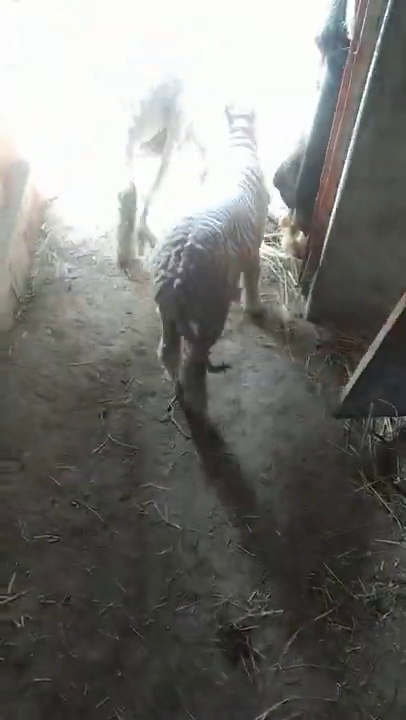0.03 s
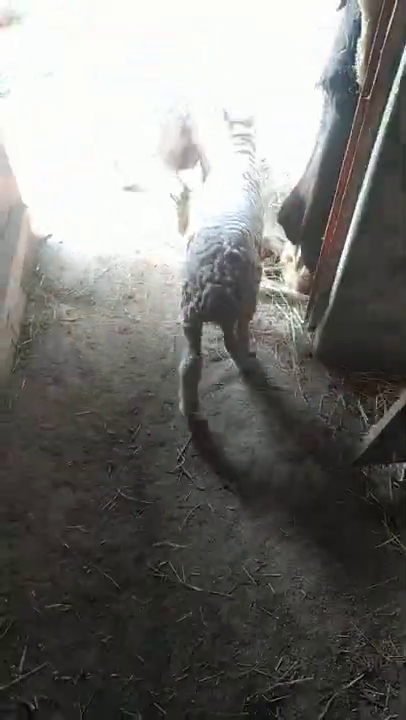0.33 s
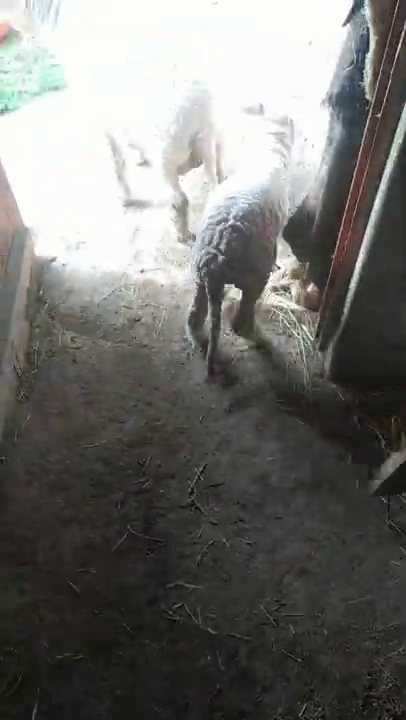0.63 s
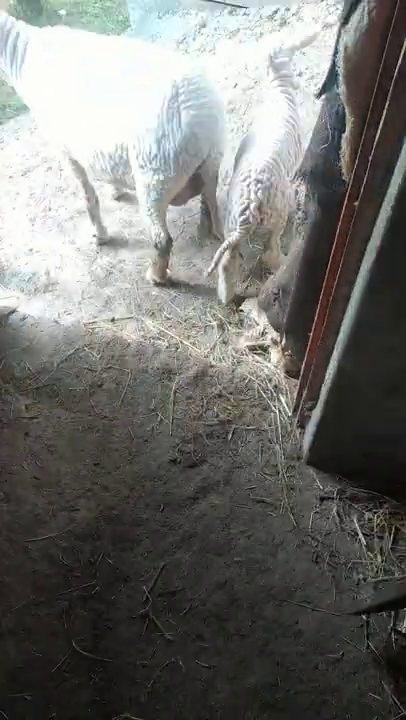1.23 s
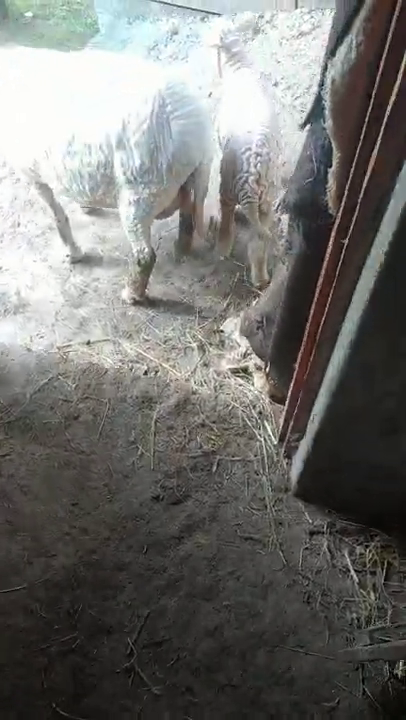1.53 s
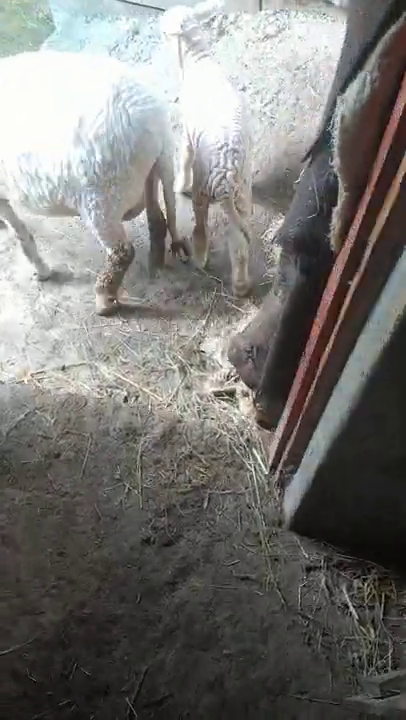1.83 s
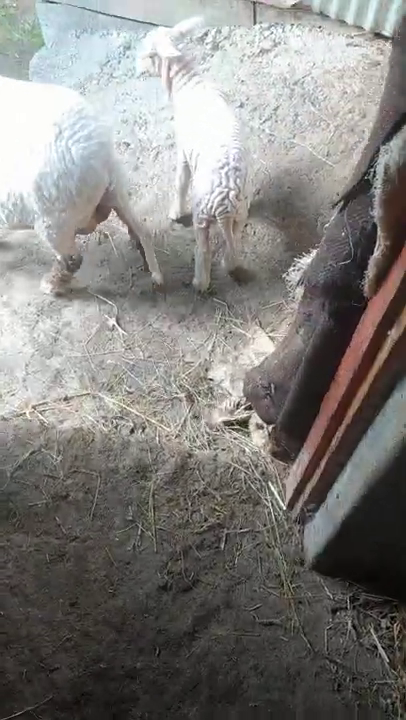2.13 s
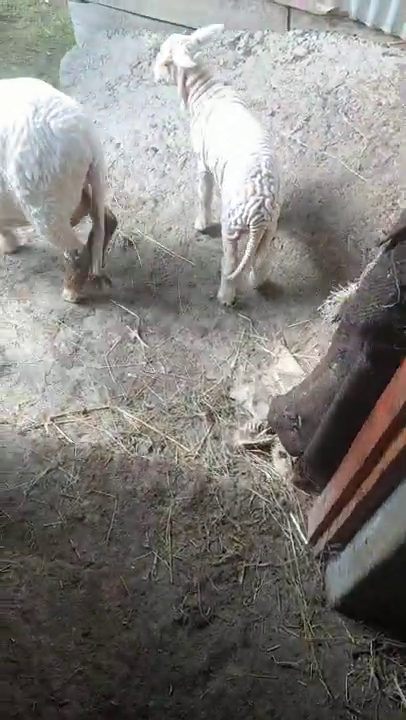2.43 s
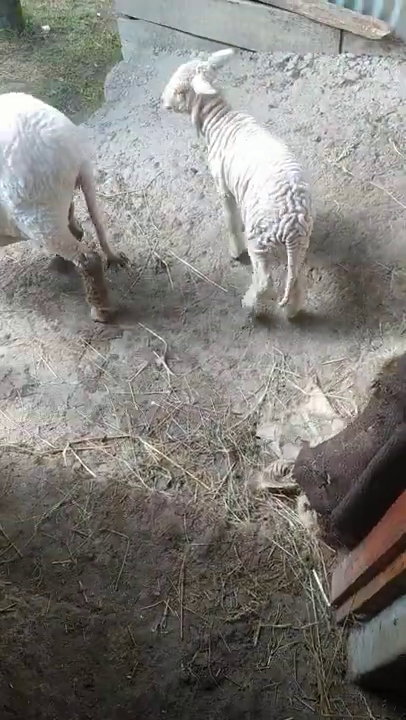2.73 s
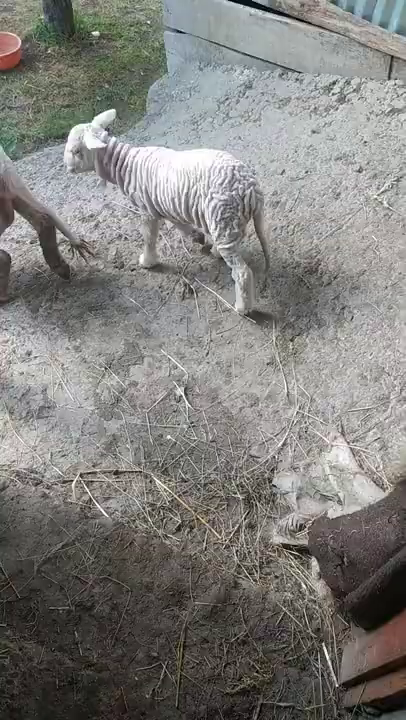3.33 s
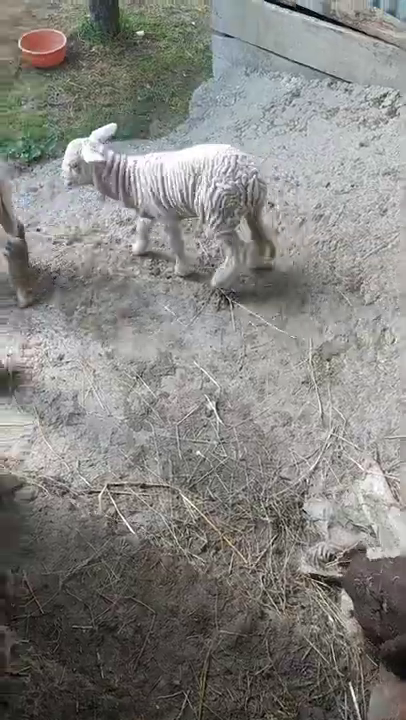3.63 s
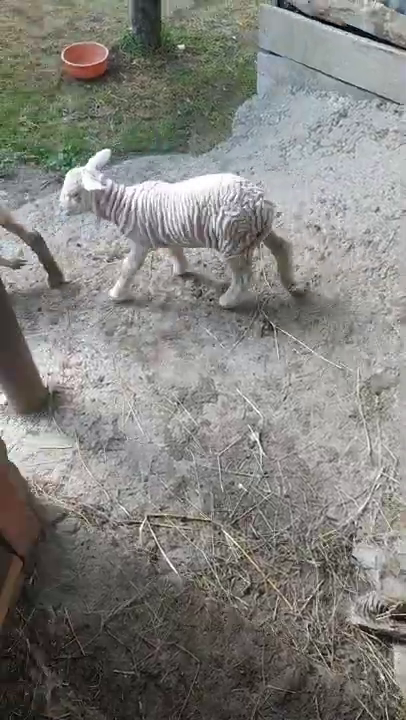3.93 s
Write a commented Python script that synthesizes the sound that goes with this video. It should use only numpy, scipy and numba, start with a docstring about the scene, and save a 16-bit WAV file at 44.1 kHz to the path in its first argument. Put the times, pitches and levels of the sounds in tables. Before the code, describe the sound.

A sheep gives one hoarse, quavering bleat from about 2.7 to 3.6 seconds, just after a soft closed-mouth murmur at 2.5. Before that, hooves tick, thud and scuff over straw and dry earth, busiest in the first 1.3 seconds. Faint gliding whistles pass between 2 and 2.8 seconds. Hooves knock at 2.2 and, more sharply, at 3.8. Shed walls add slight reflections over a quiet outdoor hiss.

```python
"""At a shed door, a ewe murmurs with her mouth shut, then gives one hoarse, quavering bleat:
uneven vocal pulses ring her throat and chop her breath into a rasp.
She and her lamb walk over straw and dry earth: hooves tick, knock, thud and scuff.
A few faint whistles glide by. The shed's walls scatter the sounds, over a quiet outdoor hiss."""
import sys
import numpy as np
from scipy import signal
from scipy.fft import rfft, irfft
from scipy.io import wavfile
from scipy.ndimage import uniform_filter1d
from numba import njit

SR = 44100
rng = np.random.default_rng(int(sys.argv[2]) if len(sys.argv) > 2 else 0)


def master_out(mix):
    """Clip the mix to full scale and print it as 16-bit PCM to the path in sys.argv[1]."""
    frames = np.transpose(np.atleast_2d(mix))
    ceiling = np.clip(frames, -1, 1)
    pcm = np.round(ceiling * 32767).astype(np.int16)
    wavfile.write(sys.argv[1], SR, pcm)


N = 176400

# spectrum of breaking straw: f/Hz, level/dB
STRAW_SPECTRUM = [(300, -9.5), (1500, -31.5), (3500, -10), (5500, -5), (7000, 0), (8300, 4.5), (9300, -2),
                  (10500, -11.5), (15500, -14.5)]
YARD_LAG_S, STRAW_LAG_S = 0.000411, 0.0001  # left channel's delay, by source position
HOOF_RISE_S = 0.004


def bleat():
    """Uneven vocal pulses ring the throat and gate a rasp; the mouth moves and the call quavers."""
    # t/s, pitch/Hz, voice/dB, rasp/dB, roughness/0-1
    call = [(2.677, 124.2, -45, -39, 0.82), (2.712, 128.2, -45.5, -47.5, 0.76),
            (2.759, 128.1, -37, -45, 0.8), (2.80, 135.1, -36.5, -39.5, 0.7),
            (2.9, 140.5, -35.5, -36.5, 0.71), (2.998, 141.6, -34.5, -35.5, 0.58),
            (3.142, 141.6, -33.5, -38, 0.48), (3.262, 139.1, -33, -37.5, 0.44),
            (3.371, 136.3, -37, -39, 0.3), (3.432, 131.5, -41.5, -44.5, 0.71),
            (3.49, 127.8, -43, -48.5, 0.6), (3.55, 126.7, -48.5, -55, 0.8), (3.655, 125.1, -58, -68, 0.91)]
    # throat resonances: f/Hz, nominal width/Hz, level/dB, share of mouth movement followed
    resonances = [(430, 54, -8.5, 0), (590, 78, 2, 0.84), (642.5, 60, 3.5, 0.97), (810, 81, -23, 0.93),
                  (1391, 108, -2, 0.5), (2082, 240, -13, 0.3)]
    # mouth opening: t/s, relative shift of the resonances
    mouth = [(2.68, -0.13), (2.76, -0.046), (2.82, 0.042), (2.90, -0.013), (3.15, 0.0064), (3.33, -0.061),
             (3.42, -0.082), (3.52, -0.096), (3.65, -.1)]
    # gliding top resonance: t/s, f/Hz, level/dB
    upper = [(2.68, 2130, -7), (2.85, 2260, -9.5), (3.05, 2340, -8.5), (3.298, 2514, -13),
             (3.421, 2670, -10.5), (3.549, 2760, -7.5), (3.65, 2890, -23)]
    # chest partials, fundamental first: level/dB
    partials = [-4, 0.5, -6, -11, 2.5, -5]
    # f/Hz, level/dB
    rasp_spectrum = [(150, -6), (400, -6), (620, 4), (800, -9), (1100, -9.5), (1400, 4.5), (1750, -11),
                     (2150, 2), (2500, -5.5), (2850, -18.5), (3200, -26), (3800, -15.5), (4700, -17),
                     (5500, -20.5), (7500, -11), (8800, -14.5), (10300, -33), (15000, -46)]
    quaver_hz, crest_s, pitch_swing, mouth_swing = 11.3, 2.983, 0.014, 0.032
    low_swing_db, high_swing_db, chest_swing_db, rasp_swing_db = 4.5, 1.6, 3.5, 0.92
    jitter, shimmer_db, puff_cycles = 0.025, 6.5, 0.26
    t = clock()
    at, *columns = np.array(call).T
    hz, voice_db, rasp_db, rough = (np.interp(t, at, c) for c in columns)
    gate = np.clip(np.minimum(t - at[0], at[-1] - t) / 0.0012, 0, 1)
    quaver = np.cos(2 * np.pi * quaver_hz * (t - crest_s))
    cycles = np.cumsum(hz * (1 + pitch_swing * quaver + jitter * rough * drift(170))) / SR
    pulses = hz / SR - np.diff(cycles % 1, prepend=0)  # one sharp vocal pulse per cycle
    pulses *= undb(shimmer_db * rough * drift(150))
    puffs = unit(np.exp(-(cycles % 1) / puff_cycles) * noise())
    source = unit(pulses) + 1.42 * rough * puffs

    def ring(track_hz, width_hz):
        stage_hz = 1.34 * width_hz  # wider, as two stages in series narrow the band
        return moving_band(moving_band(source, track_hz, stage_hz), track_hz, stage_hz)

    upper_s, *columns = np.array(upper).T
    upper_hz, upper_db = (np.interp(t, upper_s, c) for c in columns)
    throat = ring(upper_hz, width_hz=346) * undb(upper_db + high_swing_db * quaver)
    opening = np.interp(t, *np.array(mouth).T) + mouth_swing * quaver
    for centre_hz, width_hz, db, follow in resonances:
        swing_db = low_swing_db if centre_hz < 1000 else high_swing_db
        throat += undb(db + swing_db * quaver) * ring(centre_hz * (1 + follow * opening), width_hz)
    throat = throat / np.std(throat[gate > 0]) * gate * undb(voice_db)
    chest = sum(undb(db) * np.sin((k + 1) * 2 * np.pi * cycles + k ** 2) for k, db in enumerate(partials))
    chest_db = voice_db - 9 + chest_swing_db * quaver + rough * (drift(75) - 5)
    chest = unit(chest) * gate * undb(chest_db)
    rasp = colour(puffs, rasp_spectrum) * gate * undb(rasp_db + rasp_swing_db * quaver)
    return shed(throat, wet_db=3, pan_db=1.3) + shed(rasp, wet_db=13, pan_db=-4) + chest


def murmur():
    """A soft, nearly pure hum with the mouth shut."""
    # t/s, pitch/Hz, level/dB
    contour = [(2.42, 188.5, -77), (2.51, 185.6, -53.5), (2.57, 201, -60), (2.594, 215.6, -67),
               (2.618, 234, -46), (2.641, 159.6, -53), (2.698, 129.5, -58)]
    t = clock()
    at, hz, db = np.array(contour).T
    phase = 2 * np.pi * np.cumsum(np.interp(t, at, hz) * (1 + 0.095 * drift(121))) / SR
    hum = unit(np.sin(phase) + 0.13 * np.sin(2 * phase) + 0.22 * np.sin(3 * phase))
    level_db = np.interp(t, at, db, left=-120, right=-120) + 2 * drift(44)
    return shed(hum * undb(level_db), wet_db=0.5)


def hooves():
    """Each step snaps a stalk, crushes straw and thuds; hard contacts knock."""
    # steps on straw: t/s, level/dB, thud/dB re step, snap/dB re step, pan/dB
    steps = [(0.16, -34, -11, -7, -1), (0.595, -44, -6, -20, 1.5), (0.691, -36.5, -16, -3, -1),
             (0.96, -46, -7, -16, -5), (1.037, -46, -6, -7, 2), (1.105, -42.5, -16.5, -23, -2.5),
             (1.205, -44, -11, -12, -0.5), (1.292, -48.5, -11, -36, 1), (1.687, -39, -21, -24, 1.5),
             (1.704, -48, -26, -18, -5), (1.748, -59, -2, -20, -7), (3.204, -36, -19, -6, 3),
             (3.479, -40.5, 8.5, -1, 1)]
    # t/s, level/dB, pan/dB
    knocks = [(2.2237, -33, 2.5), (2.644, -42, -6), (3.796, -28, 3.5), (3.8106, -22, -2)]
    # f/Hz, level/dB
    thud_spectrum = [(60, -55), (200, 12), (500, 7.5), (900, 4), (2500, -4.5), (6000, -56), (15000, -75)]
    # f/Hz, level/dB
    knock_spectrum = [(80, -24), (300, -15), (700, -9), (1400, -4.5), (2700, -7.5), (4000, -8), (5500, -12),
                      (8000, -2.5), (10000, -14), (15500, -19)]
    crush = colour(grains(per_s=5000, spread_db=6), STRAW_SPECTRUM)
    thud = colour(noise(), thud_spectrum)
    out = 0
    for at, db, thud_db, snap_db, pan_db in steps:
        press = np.clip((clock() - at) / HOOF_RISE_S, 0, 1)
        snap = colour(noise() * fade(at, decay_s=0.002), STRAW_SPECTRUM) * undb(snap_db)
        body = crush * fade(at, decay_s=0.011) + undb(thud_db) * thud * fade(at, decay_s=0.012)
        out += shed(undb(db) * (snap + press * body), wet_db=-2.5, pan_db=pan_db, lag_s=STRAW_LAG_S)
    for at, db, pan_db in knocks:
        blow = noise() * (fade(at, decay_s=0.0006) + undb(-16) * fade(at, decay_s=0.013))
        knock = undb(db) * colour(blow, knock_spectrum)
        out += shed(knock, wet_db=-10, pan_db=pan_db, lag_s=STRAW_LAG_S)
    return out


def footfalls():
    """Weight lands dully on packed earth; some hooves clack on hard ground."""
    # t/s, level/dB
    landings = [(.36, -52), (.42, -63), (.60, -60), (0.859, -49), (.91, -63), (1.03, -65), (1.21, -61),
                (1.48, -60.5), (1.75, -61.5), (2.421, -70.5), (3.81, -62.5), (3.905, -67)]
    # t/s, level/dB
    clacks = [(.318, -43), (1.805, -52.5), (2.645, -40.5), (3.726, -38.5)]
    dull = thumps(landings, hz=346, width_hz=270, decay_s=0.069)
    hollow = thumps(clacks, hz=1370, width_hz=1070, decay_s=0.0035)
    return shed(dull + hollow, wet_db=-0.5)


def thumps(blows, hz, width_hz, decay_s):
    """Short blows ring one broad resonance of the ground."""
    push = sum(undb(db) * fade(at, decay_s) for at, db in blows)
    return unit(band(noise(), hz, width_hz)) * uniform_filter1d(push, size=150)


def crunch():
    """One hoof lands on loose grit and grinds it briefly."""
    # f/Hz, level/dB
    grit_spectrum = [(200, -9), (500, -5.5), (1000, 0.5), (1700, 3), (2700, 1), (4000, -3), (6500, 1),
                     (9000, 1), (11000, -26), (15000, -34)]
    start_s, hold_s, decay_s = 0.826, 0.055, 0.02
    age = clock() - start_s
    load = np.clip(age / HOOF_RISE_S, 0, 1) * np.exp(-np.maximum(age - hold_s, 0) / decay_s)
    grit = colour(grains(per_s=800, spread_db=3) * load, grit_spectrum)
    return shed(grit * undb(-44), wet_db=1, lag_s=STRAW_LAG_S)


def scuffs():
    """Legs drag over earth and through straw, which crackles on between steps; stalks crack nearby."""
    # peak t/s, rise/s, fall/s, crackle/dB, scrape/dB
    drags = [(0.047, 0.031, 0.017, -64, -56.5), (.272, 0.011, 0.0093, -53.5, -64),
             (0.316, 0.0039, 0.012, -66, -49), (0.402, 0.071, 0.008, -48.5, -52.5),
             (.61, 0.14, 0.049, -65, -62), (.785, 0.044, 0.016, -56, -54.5),
             (0.837, 0.016, 0.019, -45, -53.5), (0.867, 0.023, 0.013, -47.5, -40.5),
             (.915, 0.011, 0.0083, -47, -62), (.97, 0.027, 0.011, -78, -51),
             (1.05, 0.029, 0.017, -54.5, -57), (1.11, 0.019, 0.013, -65, -62),
             (1.30, 0.071, 0.01, -63.5, -84), (1.79, 0.21, 0.47, -67, -68),
             (2.086, 0.014, 0.011, -49.5, -54.5), (2.551, 0.076, 0.023, -60.5, -46.5),
             (3.475, 0.029, 0.017, -54.5, -51.5), (3.674, 0.021, 0.016, -52.5, -44),
             (3.727, 0.01, 0.008, -50.5, -47.5), (3.807, 0.02, 0.01, -43.5, -45)]
    # f/Hz, level/dB
    scrape_spectrum = [(80, 7.5), (200, 1.5), (350, 1.5), (600, -0.5), (1000, 2), (1600, 0), (2700, 1.5),
                       (4000, -4.5), (8000, -1.5), (15000, -70)]
    t = clock()
    crackle, scrape = undb(-70 + 3 * drift(14)), 0
    for at, rise_s, fall_s, crackle_db, scrape_db in drags:
        swell = np.exp(-np.abs((t - at) / np.where(t < at, rise_s, fall_s)) ** 1.15)
        crackle += undb(crackle_db) * swell
        scrape += undb(scrape_db) * swell
    straw = colour(grains(per_s=2500, spread_db=6) * crackle, STRAW_SPECTRUM) * undb(3)
    stalks = colour(grains(per_s=450, spread_db=2.5) * crackle, STRAW_SPECTRUM) * undb(-3)
    earth = colour(grains(per_s=2500, spread_db=3.5) * scrape, scrape_spectrum)
    tread = unit(band(noise(), hz=270, width_hz=560)) * undb(-70 + 1.87 * drift(2.9))
    return (shed(stalks, wet_db=-3, lag_s=STRAW_LAG_S) + shed(straw, wet_db=10, pan_db=-2.5)
            + shed(earth, wet_db=7.5, lag_s=STRAW_LAG_S) + shed(tread, wet_db=-6.5))


def whistles():
    """Faint, husky tones: gliding bands of narrow noise."""
    # t/s, length/s, start f/Hz, end f/Hz, width/Hz, level/dB
    glides = [(2.032, 0.066, 1760, 2080, 220, -58.5), (2.058, 0.105, 3160, 3045, 149, -53.5),
              (2.065, 0.099, 1637, 1520, 120, -61.5), (2.126, 0.15, 2930, 2420, 382, -54.5),
              (2.13, 0.09, 2570, 2308, 308, -52), (2.331, 0.14, 2640, 2960, 565, -57.5),
              (2.428, 0.059, 2700, 2190, 402, -55), (2.435, 0.061, 2160, 1693, 304, -53.5),
              (2.641, 0.04, 4150, 4254, 400, -52), (2.683, 0.079, 3160, 3016, 223, -47)]
    t, out = clock(), 0
    for at, length_s, start_hz, end_hz, width_hz, db in glides:
        progress = np.clip((t - at) / length_s, 0, 1)
        phase = 2 * np.pi * np.cumsum(start_hz + (end_hz - start_hz) * progress) / SR
        tone = drift(width_hz) * np.cos(phase) + drift(width_hz) * np.sin(phase)
        out += undb(db) * np.sin(np.pi * progress) * tone
    return shed(out, wet_db=-1, pan_db=-3)


def outdoors():
    """Steady hiss and a slight, gusting rumble of air, each partly common to both channels."""
    # f/Hz, level/dB
    hiss_spectrum = [(20, 36.5), (45, -20), (95, -3.5), (160, 26), (350, -1), (700, 7), (1500, 9),
                     (4000, 5.5), (6000, -8), (8200, -2.5), (10500, -29), (15500, -16)]
    hiss = np.array([colour(noise(), hiss_spectrum) for _ in range(2)])
    hiss += 0.47 * colour(noise(), hiss_spectrum)
    rumble = band(np.array([noise(), noise()]) + 1.45 * noise(), hz=26, width_hz=46)
    gusts = undb(2.5 * drift(6))
    return unit(hiss) * undb(-63) + unit(rumble) * undb(-68) * gusts


def shed(x, wet_db, pan_db=0, lag_s=YARD_LAG_S):
    """Direct sound, later on the left, plus the walls' scattered echoes; positive pan is left."""
    t60_s, low_cut_hz = 0.21, 317
    t = np.arange(SR // 2) / SR
    tail = rng.standard_normal((2, len(t))) * np.exp(-np.log(1000) * t / t60_s) * (t > 0.002)
    tail = signal.sosfilt(signal.butter(2, low_cut_hz, "high", fs=SR, output="sos"), tail)
    echo = signal.fftconvolve(x[None], tail / np.sqrt(np.sum(tail ** 2) / 2), axes=1)[:, :N]
    late = irfft(rfft(x) * np.exp(-2j * np.pi * np.arange(N // 2 + 1) * SR / N * lag_s), N)
    mix = (np.array([late, x]) + undb(wet_db) * echo) / np.hypot(1, undb(wet_db))
    return mix * undb(np.array([[pan_db], [-pan_db]]) / 2)


def undb(db):
    """Decibels to gain."""
    return 10 ** (np.asarray(db) / 20)


def unit(x):
    """Scale to rms 1."""
    return x / np.sqrt(np.mean(x ** 2) + 1e-20)


def clock():
    """Sample times in s."""
    return np.arange(N) / SR


def noise():
    """White noise."""
    return rng.standard_normal(N)


def drift(rate_hz):
    """Smooth random wander, rms 1."""
    span = max(int(SR / rate_hz), 2)
    return unit(uniform_filter1d(uniform_filter1d(noise(), span, mode="wrap"), span, mode="wrap"))


def grains(per_s, spread_db):
    """Dense tiny cracks of unequal size, rms 1."""
    size = undb(spread_db * np.minimum(rng.exponential(size=N), 6))
    return unit(noise() * size * (rng.random(N) < per_s / SR))


def fade(start_s, decay_s):
    """Sudden onset, exponential decay."""
    age = clock() - start_s
    return (age >= 0) * np.exp(-np.abs(age) / decay_s)


def colour(x, spectrum):
    """Minimum-phase filter of unit power through (f/Hz, level/dB) points."""
    hz, db = np.array(spectrum, float).T
    bins_hz = np.arange(N // 2 + 1) * SR / N
    gain = unit(undb(np.interp(np.log(bins_hz + 1), np.log(hz), db)))
    cepstrum = irfft(np.log(gain), N)
    response = np.exp(rfft(2 * cepstrum * (np.arange(N) < N // 2)) - cepstrum[0])
    return irfft(rfft(x) * response, N)


def band(x, hz, width_hz):
    """Two equal resonators in series, each width_hz wide."""
    b, a = signal.iirpeak(hz, hz / width_hz, fs=SR)
    return signal.lfilter(b, a, signal.lfilter(b, a, x))


@njit
def moving_band(x, hz, width_hz):
    """State-variable resonator with a moving centre."""
    y, band_state, low_state = np.empty(len(x)), 0., 0.
    for i in range(len(x)):
        g, damping = np.tan(np.pi * hz[i] / SR), width_hz / hz[i]
        v = (band_state + g * (x[i] - low_state)) / (1 + g * (g + damping))
        band_state, low_state = 2 * v - band_state, low_state + 2 * g * v
        y[i] = damping * v
    return y


def scene():
    """All sources at the shed door, in stereo."""
    return bleat() + murmur() + whistles() + hooves() + footfalls() + crunch() + scuffs() + outdoors()


def record(dry):
    """The left microphone is a little brighter than the right; the recorder cuts the top."""
    treble_hz, treble_tilt, top_hz = 8800, 0.4, 15850
    treble = signal.sosfilt(signal.butter(1, treble_hz, "high", fs=SR, output="sos"), dry)
    heard = dry + treble_tilt * treble * np.array([[1], [-1]])
    return signal.sosfilt(signal.ellip(10, 0.2, 70, top_hz, fs=SR, output="sos"), heard)


dry = scene()
out = record(dry)
master_out(out)
```